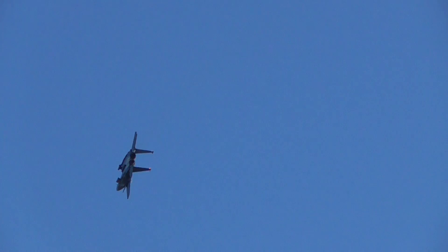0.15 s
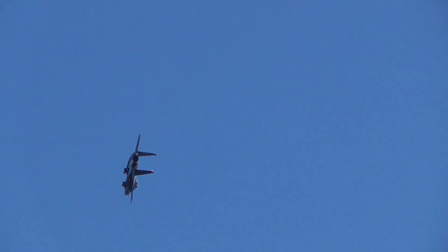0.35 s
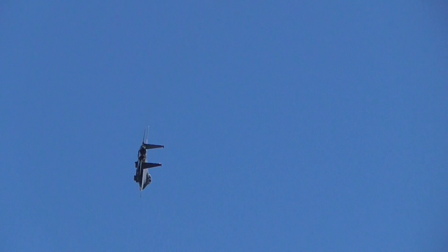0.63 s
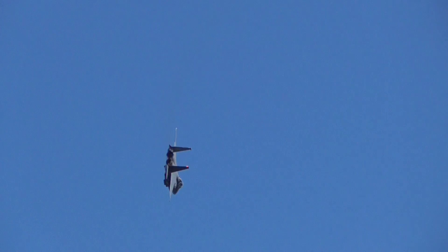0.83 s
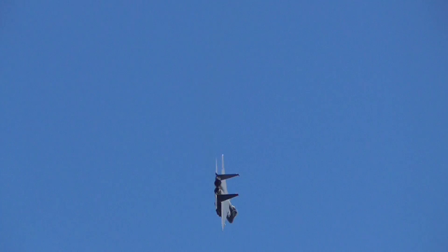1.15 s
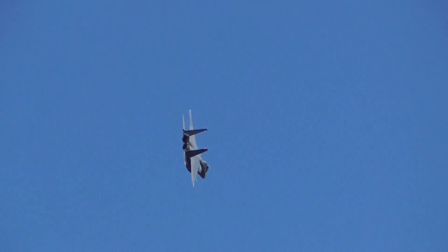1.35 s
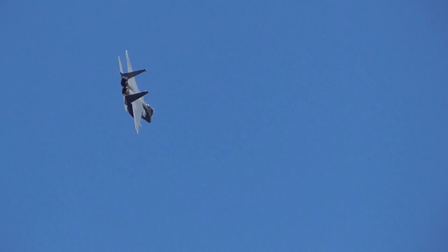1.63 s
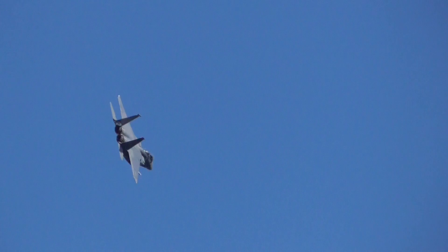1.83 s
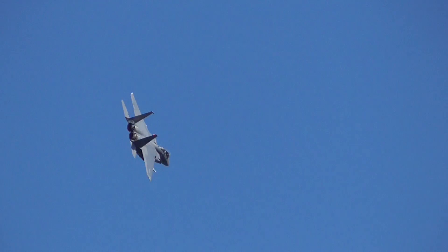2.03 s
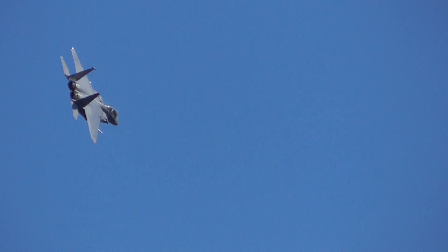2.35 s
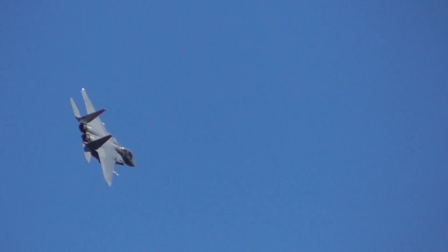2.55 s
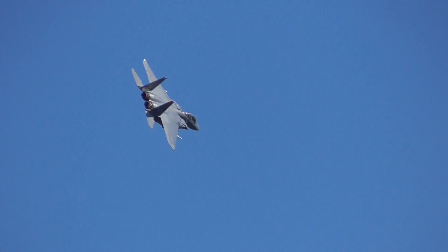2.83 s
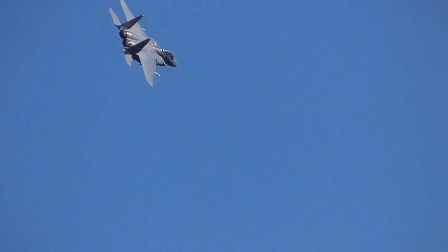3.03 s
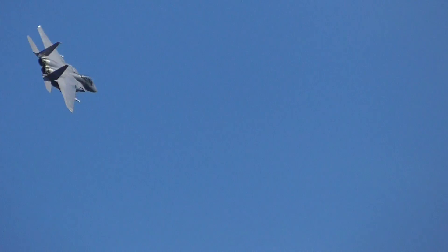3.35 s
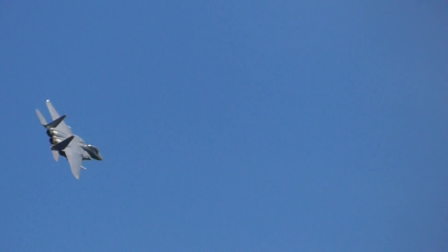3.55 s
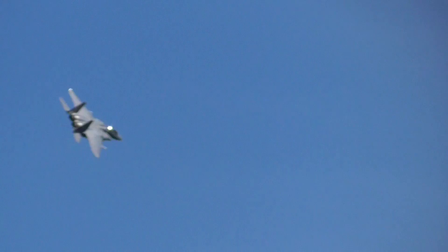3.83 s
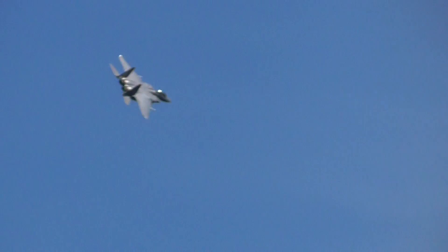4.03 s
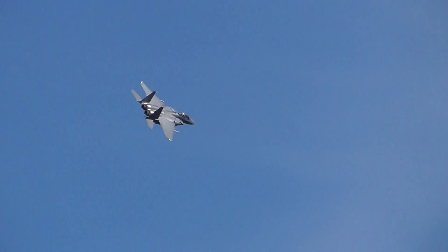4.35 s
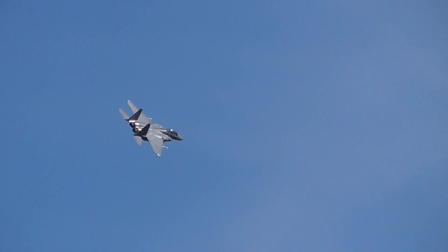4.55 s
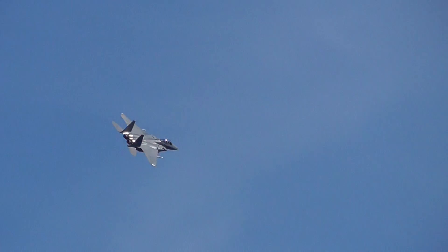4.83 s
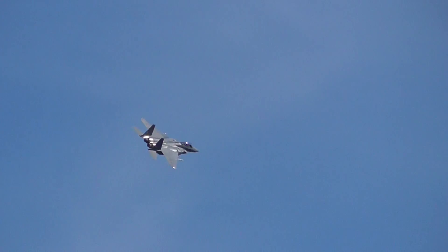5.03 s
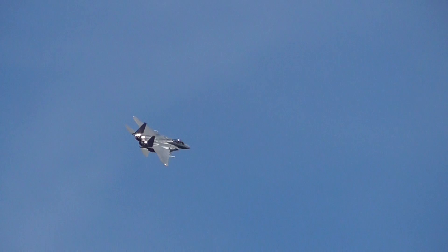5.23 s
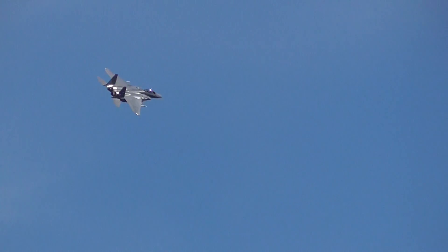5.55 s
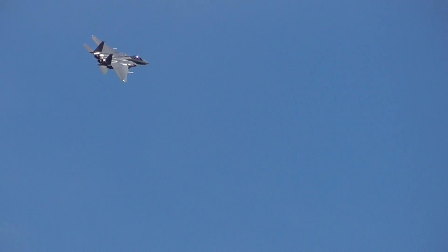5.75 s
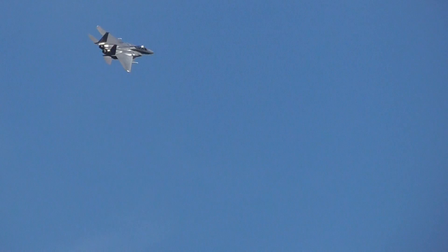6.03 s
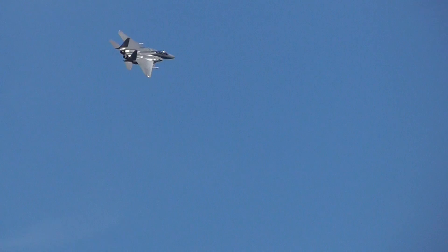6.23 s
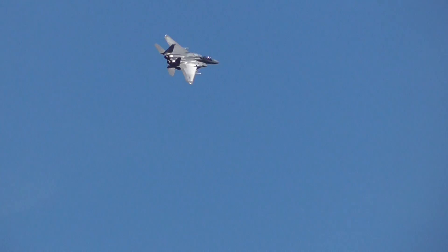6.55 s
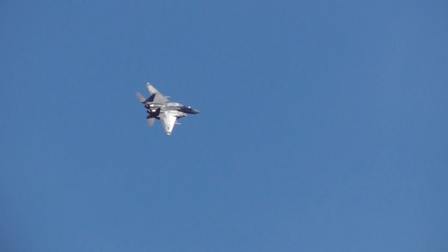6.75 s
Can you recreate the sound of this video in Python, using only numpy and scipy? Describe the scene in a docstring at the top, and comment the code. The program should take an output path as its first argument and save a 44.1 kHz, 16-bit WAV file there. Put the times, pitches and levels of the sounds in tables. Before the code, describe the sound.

Starting at full strength, a fighter jet roars overhead outdoors, heard through a camcorder's small stereo microphone. From 0 to about 2.3 s the thick low-mid exhaust noise surges irregularly and overloads the microphone: harsh, gritty crackle comes in tight bursts with very brief gaps, gradually weakening. A ground reflection gives the roar a hollow, phasing colour that mostly slides upward. From 2.3 to 4.3 s the sound is cleaner and darker, a fluttering, lumpy rumble with occasional small spits and lone dry snaps. Around 4.3 to 5 s it falls off markedly into a distant, soft, uneven rush. Low wind buffeting rises from 4.4 s, with a small gust near 4.9 s, and thin high hiss emerges after 5 s. From about 5.9 s a tiny lens motor ticks rapidly, clearest until 6.6 s, then faintly; a final wind puff comes near 6.8 s.

```python
"""Fighter jet banking away

A twin-engined fighter banks away overhead and climbs, its exhaust turned toward a camcorder. The roar is noise
in bands of eddy size; a ground echo of mostly shrinking lag sweeps a comb of peaks upward. At first clipped
crests crackle at the microphone, with spits and lone snaps. As the jet recedes, filtered noise makes a hiss
and a breeze on the ports, and struck resonances make a ticking lens motor."""
import sys
import numpy as np
from scipy import signal
from scipy.fft import rfft, irfft, next_fast_len
from scipy.io import wavfile
from scipy.ndimage import uniform_filter1d

SR = 44100
rng = np.random.default_rng(int(sys.argv[2]) if len(sys.argv) > 2 else 0)


def unload_audio(sound):
    """Save the sound as a 16-bit wav file, at the path given as the first command line argument."""
    columns = np.transpose(np.atleast_2d(sound))
    # keep every value between -1 and 1, then stretch to whole-number steps
    steps = np.round(np.clip(columns, -1, 1) * 32767)
    wavfile.write(sys.argv[1], SR, steps.astype(np.int16))


N = 303849
PADDED = next_fast_len(N + SR // 10, True)  # room for filter tails
T = np.arange(N) / SR  # seconds
F = np.maximum(np.fft.rfftfreq(PADDED, 1 / SR), 1)  # Hz
SIDES = np.array([[1], [-1]])  # left, right

# Exhaust noise by eddy size, before trims and swells. Each row: time in seconds, then the levels in dB
# of deep, rumble, roar, growl, rush and sizzle.
JET_LEVELS = [(0.0, -30.5, -22, -15, -24.5, -20, -41), (0.12, -29, -24.5, -18.5, -23, -24.5, -46.5),
              (0.5, -23, -24, -20, -19.5, -22.5, -44.5), (1.1, -27.5, -28, -21, -21, -23, -50.5),
              (1.3, -23.5, -24, -18.5, -23.5, -24.5, -49.5), (1.52, -25.5, -25.5, -17.5, -23.5, -26.5, -51),
              (1.86, -26.5, -20, -21, -18.5, -25, -48.5), (2.15, -23, -30.5, -16, -21.5, -28.5, -53.5),
              (2.38, -26.5, -25, -22.5, -27, -27.5, -48.5), (2.55, -22, -26, -31.5, -21.5, -27.5, -50),
              (2.87, -25, -22, -25, -24, -25.5, -49.5), (3.2, -30.5, -18, -20.5, -23.5, -26, -50),
              (3.42, -29.5, -20.5, -22.5, -22.5, -27, -47.5), (3.88, -33.5, -15.5, -20, -24, -28, -53),
              (4.38, -35.5, -21.5, -20.5, -29.5, -30, -60.5), (4.68, -38, -19.5, -27.5, -30, -32.5, -58),
              (4.88, -34, -29, -31, -32.5, -32.5, -58.5), (5.22, -37, -28, -35, -27, -31, -56),
              (5.42, -32.5, -29.5, -30, -27, -27, -53.5), (5.65, -34.5, -26.5, -32.5, -26, -24.5, -54.5),
              (5.98, -38, -33, -30, -27, -28.5, -56), (6.25, -35.5, -30, -29, -26, -29, -57),
              (6.89, -48, -32.5, -35, -28.5, -31, -60.5)]
# Colour of a clipped crest. Each row: frequency in Hz, relative gain in dB.
CRACKLE_COLOUR = [(500, -71), (2000, -30.5), (3800, -2), (4800, -2.5), (6000, -9), (8000, 2), (11000, 3.5),
                  (15500, 1.5)]
# Lone crests that snap on their own. Each row: start in seconds, relative peak in dB.
LONE_CRESTS = [(0.3187, -29), (0.5357, -33), (0.7432, -39), (0.9308, -26), (1.075, -29), (1.5194, -32),
               (1.9604, -43.5), (1.979, -40), (2.2697, -54), (2.2805, -58), (2.309, -41.5), (2.3147, -46),
               (2.319, -48), (2.325, -53), (2.38, -53), (2.4205, -40), (2.6655, -50), (2.911, -49),
               (3.2082, -46), (3.303, -34.5), (3.3104, -49), (3.3242, -42), (3.4193, -40.5), (3.4526, -52),
               (3.486, -54), (3.5793, -52), (3.5914, -58), (3.6218, -45.5), (3.6264, -51), (3.8327, -53),
               (3.8427, -47), (3.8543, -40), (3.9045, -60), (3.9459, -41), (3.9534, -64), (3.9898, -50),
               (4.124, -47.5), (4.171, -41.5), (4.183, -49), (4.2845, -52)]


def undb(db):
    """Decibels to an amplitude factor."""
    return 10 ** (np.asarray(db) / 20)


def curves(table):
    """Each column of a timed table, at every sample."""
    s, *columns = np.transpose(table)
    return [np.interp(T, s, column) for column in columns]


def colour(points):
    """Gain at every frequency from (Hz, dB) points."""
    hz, db = np.transpose(points)
    return undb(np.interp(np.log(F), np.log(hz), db))


def shape(x, gain):
    """Filter by a gain at every frequency."""
    return irfft(rfft(x, PADDED) * gain, PADDED)[..., :N]


def unit(x):
    """Scale to rms 1."""
    return x / np.sqrt(np.mean(x ** 2))


def envelope(x, seconds):
    """Running rms, its power smoothed twice."""
    size = max(int(seconds * SR), 2)
    power = uniform_filter1d(uniform_filter1d(x ** 2, size), size)
    return np.sqrt(np.abs(power) + 1e-18)


def flutter(hz):
    """Slow random wander of rms 1."""
    return unit(shape(rng.standard_normal(N), 1 / (1 + (F / hz) ** 4)))


def stereo_noise(gain, side):
    """Coloured noise on two ports that differ by the side share."""
    mid = shape(rng.standard_normal(N), gain)
    return mid + SIDES * shape(rng.standard_normal(N), gain * side)


def clicks(per_s, spread_db):
    """Random clicks, most small and a few large, with rms 1."""
    count = int(per_s * N / SR)
    when, size, sign = rng.random((count, 3)).T
    heights = np.sign(sign - .5) * undb(-spread_db * np.log(size + 1 / 300))
    return unit(np.bincount((when * N).astype(int), heights, N))


def crackle_level():
    """Crackle in dB before lulls and raggedness: a base easing as the jet turns away, plus bell-shaped surges."""
    # Surges of the roar that overload the microphone. Each row: peak in seconds, length in seconds, crackle in dB.
    surge_table = [(0.006, 0.048, -46), (0.114, 0.084, -38), (0.272, 0.025, -43), (0.31, 0.023, -43),
                   (0.4, 0.059, -48.5), (0.565, 0.039, -44), (0.622, 0.026, -51), (0.745, 0.056, -42),
                   (0.806, 0.061, -42.5), (0.931, 0.061, -44), (1.008, 0.044, -46.5), (1.074, 0.036, -39.5),
                   (1.149, 0.065, -44), (1.46, 0.15, -50), (1.526, 0.059, -44), (1.61, 0.04, -62),
                   (1.693, 0.06, -45.5), (1.76, 0.026, -49.5), (1.87, 0.041, -54), (1.965, 0.02, -62),
                   (2.019, 0.022, -51), (2.114, 0.053, -50), (2.204, 0.089, -52.5)]
    base_db, fall_db_per_s = -48.5, 6
    base = undb(base_db - fall_db_per_s * T)
    surges = sum(undb(db) * np.exp(-2 * ((T - s) / length) ** 2) for s, length, db in surge_table)
    return 20 * np.log10(np.hypot(base, surges))


def crest_swells(swell_db=1, swell_s=0.0026, full_crest_db=-37):
    """The roar bulges briefly, in dB, around each lone crest, more for the louder ones."""
    swell = np.zeros(N)
    for s, db in LONE_CRESTS:
        span = slice(int(s * SR) - SR // 50, int(s * SR) + SR // 50)
        swell[span] += undb((db - full_crest_db) / 2) * np.exp(-((T[span] - s) / swell_s) ** 2)
    return swell_db * np.minimum(swell, 1)


def ground_echo(x, phase=0.37, soft_hz=380, ground_hz=1000):
    """The sound plus its duller bounce off the ground, whose lag mostly shrinks as the jet nears the horizon."""
    # Lag of the bounce behind the direct sound. Each row: time in seconds, lag in ms.
    lag_table = [(0, 7.65), (.55, 7.55), (1.1, 7.37), (1.5, 7.1), (1.9, 6.72), (2.25, 6.55), (2.5, 6.62),
                 (2.85, 6.33), (3.45, 6.27), (3.9, 6.1), (4.25, 5.68), (4.55, 5.52), (5.6, 5.7),
                 (6.89, 5.35)]
    # How much the ground returns. Each row: time in seconds, strength from 0 to 1.
    strength_table = [(0, 0.48), (.55, 0.4), (1.1, 0.57), (1.7, 0.41), (2.4, 0.5), (2.85, 0.07),
                      (3.45, 0.51), (4, 0.13), (4.45, 0.5), (5.1, 0.13), (6.89, 0)]
    lag_ms, strength = curves(lag_table)[0], curves(strength_table)[0]
    turn = np.exp(1j * phase / (1 + (F / soft_hz) ** 2))  # soft ground turns the phase of long waves
    bounce = shape(x, turn / np.sqrt(1 + (F / ground_hz) ** 2))  # grass returns little of the top
    delayed = np.array([np.interp(T - lag_ms / 1000, T, channel) for channel in bounce])
    return x + strength * delayed


def recede(x, edge_hz=4600, from_s=1.1, db_per_s=4):
    """As the path lengthens, the top edge of the roar fades away."""
    dull = shape(x, 1 / (1 + (F / edge_hz) ** 20))
    return dull + (x - dull) * undb(-db_per_s * np.maximum(T - from_s, 0))


def exhaust(surge_db, upper_db=-4, upper_share=0.23, settle_s=0.79, surge_lift=0.34, shimmer_hz=24):
    """Turbulent mixing noise, band by band of eddy size; unsteady air makes the short waves surge and shimmer most."""
    # Upper edges of all bands but the last, in Hz.
    eddy_edges = (150, 235, 380, 620, 1150, 2400, 3400)
    # Colour of the noise before its bands are levelled. Each row: frequency in Hz, relative density in dB per Hz.
    exhaust_colour = [(30, -53.5), (55, -32), (80, -25.5), (120, -7), (165, 1), (230, 4), (315, 7.5),
                      (400, 0.5), (470, 0.5), (620, -3.5), (920, -15), (1400, -17.5), (2200, -24.5),
                      (4200, -58.5), (6000, -48)]
    # Stereo width of the source noise. Each row: frequency in Hz, side minus mid in dB.
    width_table = [(60, -8), (160, -23.5), (300, -23), (650, -16), (1300, -12.5), (2600, -13), (5000, -9.5)]
    # Resonances of the microphone housing. Each row: frequency in Hz, width in Hz, gain in dB.
    housing_modes = [(922, 200, 5.5), (1103, 89, -2.5), (1333, 360, 9.5), (1720, 200, -1.5),
                     (2090, 810, 10.5), (2493, 1200, -11.5), (3740, 2000, 3.5)]
    # Air swallows the shortest waves over the distance. Each row: time in seconds, dB relative to the sizzle.
    air_table = [(0, 1), (2, -2.5), (3, -9), (4.4, -8), (5, -13.5), (5.6, -11), (6.89, -9.5)]
    # Bearing of the jet. Each row: time in seconds, left minus right in dB.
    pan_table = [(0, -1.5), (1.4, -.3), (2.7, .7), (3.7, .1), (4.8, .4), (5.7, .3), (6.89, 1.4)]
    # One value for each of the eight bands, long waves to short.
    trims_db = (-.5, -.4, -.3, -.3, -.2, 0, -.7, -1.2)
    shimmers_db = (.2, .3, .5, .8, .8, 1.2, 1.2, 1.2)
    surge_shares = (0, 0, .4, 1.1, .9, 1.1, 1.1, 1.1)

    deep, rumble, roar, growl, rush, sizzle = curves(JET_LEVELS)
    upper = rush + upper_share * (sizzle - rush) + upper_db  # the top of the rush dulls with the sizzle
    bulge = crest_swells()
    levels = (deep, rumble + bulge, roar + bulge, growl + bulge / 2, rush + bulge / 2,
              upper, sizzle, sizzle + curves(air_table)[0])
    # surge_lift: dB of swell per dB of crackle above its local average
    swell = surge_lift * (surge_db - uniform_filter1d(surge_db, int(settle_s * SR)))

    housing = undb(sum(db / (1 + (2 * (F - hz) / width) ** 2) for hz, width, db in housing_modes))
    far = 1 / (1 + (F / 4850) ** 11)  # little above 4850 Hz survives the path
    rest = ground_echo(stereo_noise(colour(exhaust_colour) * housing * far, colour(width_table)))
    out, shimmer = 0, flutter(shimmer_hz)
    for edge, db, trim, depth, share in zip((*eddy_edges, SR), levels, trims_db, shimmers_db, surge_shares):
        band = shape(rest, 1 / (1 + (F / edge) ** 20))
        rest = rest - band
        band = band * undb(depth * shimmer)
        steady = band / envelope(band.mean(axis=0), 0.34)
        out = out + steady * undb(db + trim + share * swell)
    return recede(out) * undb(SIDES * curves(pan_table)[0] / 2)


def lulls():
    """Gain of the overload, which breaks off where the crests briefly stay within reach."""
    # Breaks in the crackle. Each row: centre in seconds, half length in seconds, depth in dB.
    lull_table = [(0.256, .004, -10), (0.363, .011, -12), (0.529, 0.0042, -8), (0.668, 0.0078, -12),
                  (0.704, 0.0046, -7), (0.899, .005, -8), (1.105, 0.0037, -7), (1.302, .011, -16),
                  (1.79, .008, -16), (1.945, 0.012, -20), (1.992, .007, -9), (2.262, .008, -16)]
    return undb(sum(db * np.exp(-((T - s) / half) ** 4) for s, half, db in lull_table))


def overload(x, db, crackle_db=0.5, flatten=0.42, apart=0.32, ragged_db=2.5, ragged_hz=55,
             fizz_db=-8, fizz_per_s=4500, fizz_spread_db=5.5, fizz_apart=0.45,
             trough_bias=.3, ends_s=2.31, fade_s=0.064):
    """Crests beyond the microphone's reach are flattened, troughs first; the corners crackle, with a finer fizz."""
    # The harder the overload, the less room for a crest. Each row: crackle in dB, headroom in units of the rms.
    headroom_table = [(-64, 1.75), (-44, 1.3)]
    active = np.clip((ends_s - T) / fade_s, 0, 1) ** 2
    mid = x.mean(axis=0)
    rms = envelope(mid, 0.0061)
    pressure = (mid + apart * (x - mid)) / rms  # both ports meet nearly the same crests
    headroom = np.interp(db, *np.transpose(headroom_table))
    excess = pressure - np.clip(pressure, trough_bias - headroom, trough_bias + headroom)
    excess = shape(excess, 1 / (1 + (110 / F) ** 4))  # the preamplifier passes no offset

    corners = shape(excess, colour(CRACKLE_COLOUR))
    spread = envelope(corners.mean(axis=0), 0.18)
    corners = corners / (spread + 0.28 * spread[T < 2].mean()) * undb(crackle_db)  # partly levelled

    fizz = clicks(fizz_per_s, fizz_spread_db) + SIDES * fizz_apart * clicks(fizz_per_s, fizz_spread_db)
    # each tiny corner falls 12 dB an octave, on top of the crackle colour
    fizz = unit(shape(fizz, colour(CRACKLE_COLOUR) / F ** 2)) * undb(fizz_db)
    crackle = (corners + fizz) * undb(db + ragged_db * flutter(ragged_hz))  # steep crests tear in clusters
    return x - active * lulls() * (flatten * excess * rms + crackle)


def spits(spit_db=-7, spit_s=0.0011, patter_db=-7, per_s=420, spread_db=3.0,
          hz=3650, width_hz=1500, spit_width_hz=2000, ends_s=4):
    """Weak shock fronts patter in the sizzle while the exhaust faces the listener; the stronger ones spit."""
    # Shock fronts dulled by the air. Each row: peak in seconds, relative level in dB.
    spit_table = [(2.3152, -42), (2.3442, -37), (2.4205, -38), (2.454, -32), (2.8894, -44), (3.283, -47),
                  (3.302, -41), (3.3229, -43), (3.3574, -40), (3.3928, -43), (3.455, -44), (3.485, -35),
                  (3.7145, -45), (3.8368, -42), (3.8543, -41), (3.947, -38), (4.171, -46)]

    def dulled(width):
        return 1 / (1 + (2 * (F - hz) / width) ** 4)

    facing = np.clip((ends_s - T) * 2, 0, 1)
    sizzle_db = curves(JET_LEVELS)[-1]
    patter = unit(shape(clicks(per_s, spread_db), dulled(width_hz))) * undb(sizzle_db + patter_db) * facing
    bursts = np.zeros(N)
    for s, db in spit_table:
        span = slice(int(s * SR) - SR // 100, int(s * SR) + SR // 100)
        bursts[span] += undb(db + spit_db) * np.exp(-np.abs(T[span] - s) / spit_s)
    return patter + bursts * unit(shape(rng.standard_normal(N), dulled(spit_width_hz)))


def breeze(side=2.1, restless_db=2.0, restless_hz=5, calm_db=-65, breeze_db=-37,
           rises_s=4.37, rise_s=0.94, gust_s=0.028):
    """Low buffeting pushes the two ports mostly against each other; it rises late from a calm, with a few gusts."""
    # Colour of the wind. Each row: frequency in Hz, relative density in dB per Hz.
    buffet_colour = [(20, -25.5), (45, -17), (70, -5), (110, -6), (200, -4), (500, -18.5), (2000, -80.5)]
    # Single gusts on the ports. Each row: peak in seconds, level in dB.
    gust_table = [(4.86, -34), (6.815, -27)]
    wind = stereo_noise(colour(buffet_colour), side)
    risen = np.clip((T - rises_s) / rise_s, 0, 1)
    steady = undb(calm_db + risen * (breeze_db - calm_db) + restless_db * flutter(restless_hz))
    gusts = sum(undb(db) * np.exp(-((T - s) / gust_s) ** 2) for s, db in gust_table)
    return wind / envelope(wind.mean(axis=0), 0.11) * np.hypot(steady, gusts)


def hiss(pan_db=-2):
    """Thin coloured noise, unrelated left and right, that swells as the roar fades."""
    # Level of the hiss before panning. Each row: time in seconds, level in dB.
    hiss_levels = [(0, -88), (3.8, -89), (4.35, -92), (4.8, -85), (5.2, -76.5), (5.8, -68.7), (6.89, -68.2)]
    # Colour of the hiss. Each row: frequency in Hz, relative density in dB per Hz.
    hiss_colour = [(1000, -15), (4500, -1), (6200, -8.5), (8200, -1), (10800, -2.5), (12000, -7.5),
                   (15500, -6.5)]
    noise = stereo_noise(colour(hiss_colour), 1)
    return noise / noise.mean(axis=0).std() * undb(curves(hiss_levels)[0] + SIDES * pan_db / 2)


def narrow_swells(x, steady_s=0.022, width_share=0.3):
    """The roar swells for a moment in one narrow band, again and again at different pitches."""
    # Brief narrow-band swells of the roar. Each row: peak in seconds, length in seconds, centre in Hz,
    # relative level in dB.
    swell_table = [(0.112, 0.045, 730, -14.5), (0.415, 0.04, 536, -14.5), (0.738, 0.035, 520, -16.5),
                   (1.01, 0.038, 1310, -22.5), (1.063, 0.03, 570, -13), (1.41, 0.079, 285, -11.5),
                   (1.546, 0.043, 537, -15.5), (1.664, 0.073, 297, -13), (2.003, 0.026, 350, -10.5),
                   (2.1, 0.042, 178, -12.5), (2.19, 0.055, 950, -23.5), (2.423, .05, 1035, -26),
                   (2.689, 0.027, 655, -18), (2.74, .06, 190, -14), (2.877, 0.078, 188, -11),
                   (3.075, 0.046, 630, -18.5), (3.13, 0.044, 480, -18), (3.226, 0.029, 680, -15.5),
                   (3.318, 0.031, 186, -16.5), (3.42, 0.11, 470, -19), (3.616, 0.066, 327, -15),
                   (3.838, 0.033, 197, -8.5), (4.18, 0.031, 317, -10), (4.263, 0.039, 356, -14.5),
                   (4.774, 0.027, 860, -27.5)]
    out, half = x.copy(), SR // 5
    for s, length, hz, db in swell_table:
        span = slice(max(int(s * SR) - half, 0), int(s * SR) + half)
        t = T[span]
        f = np.fft.rfftfreq(len(t), 1 / SR)
        narrow = 1 / (1 + (2 * (f - hz) / (width_share * hz)) ** 4)
        band = irfft(rfft(x[:, span]) * narrow, len(t))
        swollen = band / envelope(band.mean(axis=0), steady_s) * undb(db) / np.sqrt(2)
        # crossfade from the plain band to the swollen one
        out[:, span] += np.exp(-2 * ((t - s) / length) ** 2) * (swollen - band)
    return out


def lone_crests(crest_db=2.5, width_s=0.00016, uneven_db=2, cut_s=0.0003, release=0.55):
    """A lone pressure peak is cut abruptly and let go a moment later, unequally at the two ports: one dry snap."""
    out, n = np.zeros((2, N)), np.arange(SR // 200)
    chances = rng.standard_normal((len(LONE_CRESTS), 3))
    for (s, db), (stretch, lean, hold) in zip(LONE_CRESTS, chances):
        cap = np.pi * n * np.exp(-n / (width_s * SR * np.exp(0.24 * stretch)))
        let_go = s + cut_s * np.exp(hold / 2)
        for at, size in ((s, 1), (let_go, release)):
            start = int(at * SR)
            out[:, start:start + len(n)] += size * cap * undb(db + SIDES * uneven_db * lean / 2)
    return undb(crest_db) * shape(out, colour(CRACKLE_COLOUR))


def lens_motor(step_db=1.0, idle_db=-64, uneven_db=1.5, idle_from_s=5.862, idle_per_s=50,
               rattle=0.25, rattle_s=0.004, rattle_hz=4700, rattle_width_hz=800,
               tick=0.3, tick_s=0.001, tick_hz=8000):
    """Each motor step ticks, rattles and briefly rings the lens barrel; between moves it ticks on faintly."""
    # Steps of the motor. Each row: start in seconds, relative level in dB.
    motor_moves = [(5.8815, -60), (5.907, -59), (5.9464, -63), (5.9668, -60), (5.9868, -58), (6.0067, -55),
                   (6.0267, -56), (6.0467, -57), (6.0671, -58), (6.0866, -58), (6.107, -55), (6.1265, -58),
                   (6.1469, -55), (6.182, -55), (6.2267, -53), (6.2622, -52), (6.3619, -54), (6.3869, -54),
                   (6.4223, -54), (6.4667, -54), (6.4872, -55), (6.5071, -57), (6.5271, -53), (6.547, -55)]
    # Modes of the lens barrel. Each row: frequency in Hz, relative level in dB, 60 dB decay in seconds.
    barrel_modes = [(4980, -11, 0.03), (4860, -6, 0.032), (4600, -6.5, 0.018), (4150, -6, 0.014)]
    t = T[:SR // 30]
    idle = []
    for s in np.arange(idle_from_s, T[-1] - t[-1], 1 / idle_per_s):
        if min(abs(s - move) for move, _ in motor_moves) > .5 / idle_per_s:
            idle.append((s, idle_db))
    steps = idle + [(s, db + step_db) for s, db in motor_moves]

    ring = sum(undb(db) * np.sin(2 * np.pi * hz * t) * np.exp(-np.log(1000) * t / t60)
               for hz, db, t60 in barrel_modes)
    rings, contact, strike = np.zeros((3, N))
    for (s, db), chance in zip(steps, rng.standard_normal(len(steps))):
        span = slice(int(s * SR), int(s * SR) + len(t))
        size = undb(db + uneven_db * chance)
        rings[span] += size * ring
        contact[span] += size * np.exp(-t / rattle_s)
        strike[span] += size * np.exp(-t / tick_s)
    grit = unit(shape(rng.standard_normal(N), 1 / (1 + (2 * (F - rattle_hz) / rattle_width_hz) ** 2)))
    sharp = unit(shape(rng.standard_normal(N), 1 / (1 + (2 * (F - tick_hz) / tick_hz) ** 4)))
    return rings + rattle * contact * grit + tick * strike * sharp


def scene():
    """The jet at the microphone, with the breeze, the hiss and the lens motor."""
    surge_db = crackle_level()
    jet = overload(narrow_swells(exhaust(surge_db)), surge_db)
    return jet + spits() + lone_crests() + breeze() + hiss() + lens_motor()


def record(dry):
    """The camcorder cuts steeply above 15750 Hz."""
    return signal.sosfilt(signal.ellip(10, .1, 90, 15750, fs=SR, output="sos"), dry)


dry = scene()
out = record(dry)
unload_audio(out)
```